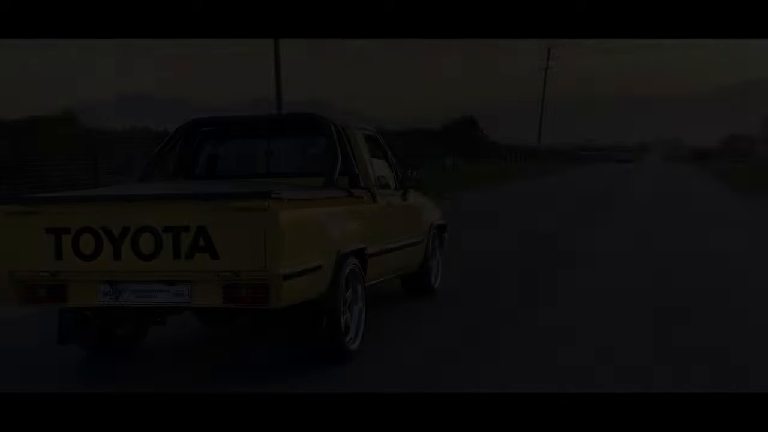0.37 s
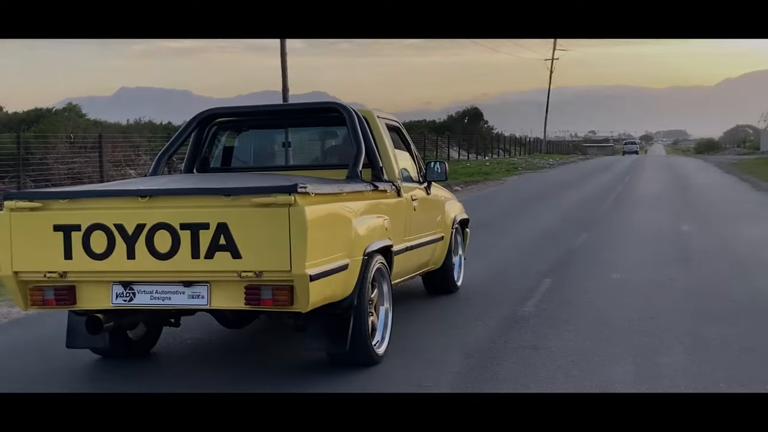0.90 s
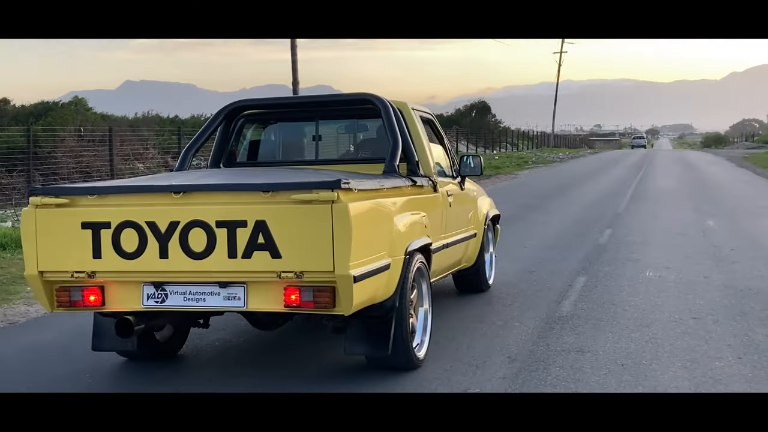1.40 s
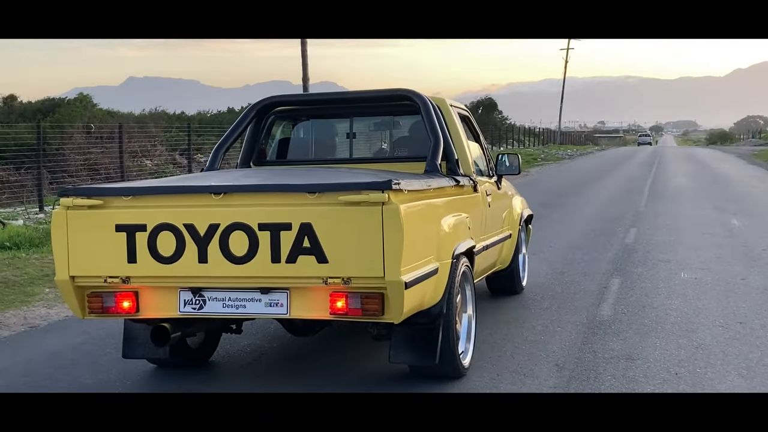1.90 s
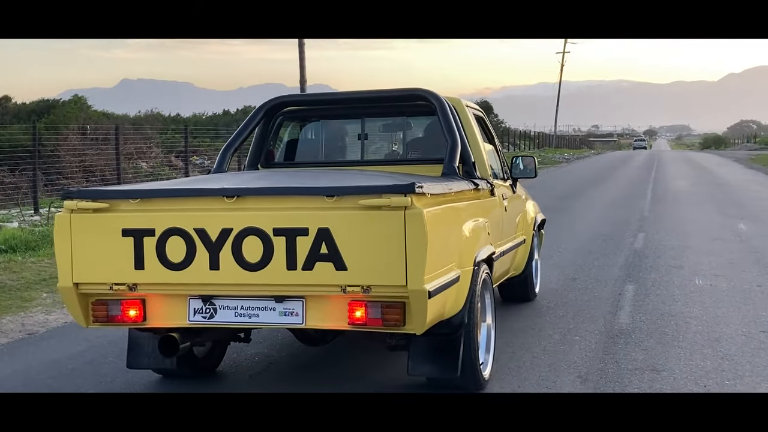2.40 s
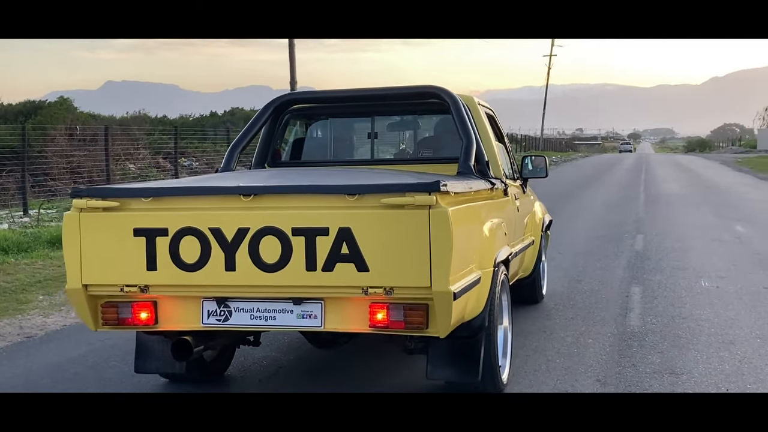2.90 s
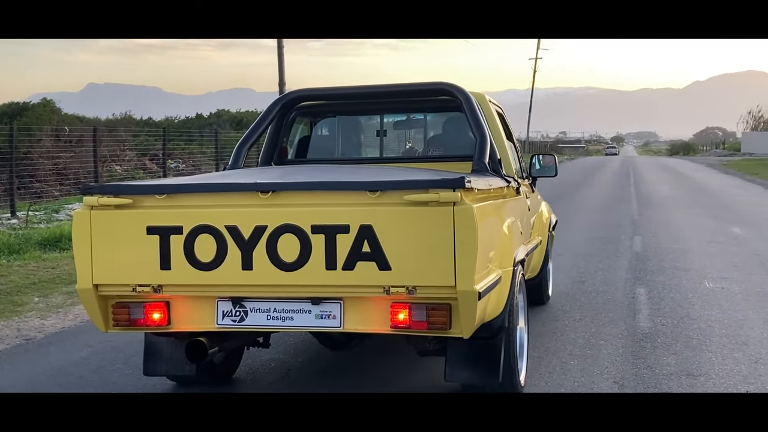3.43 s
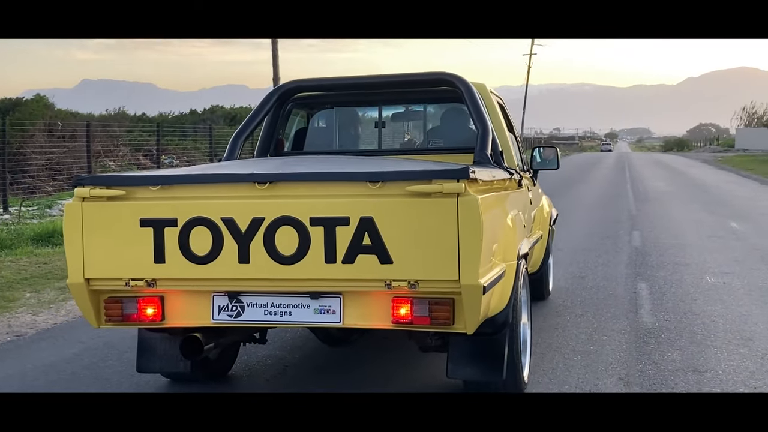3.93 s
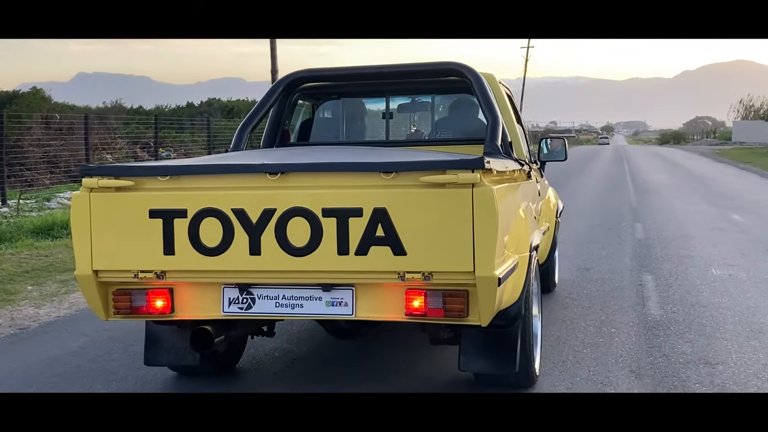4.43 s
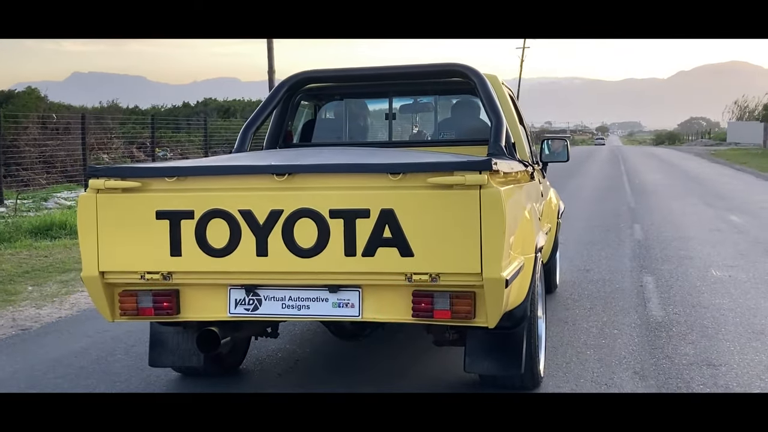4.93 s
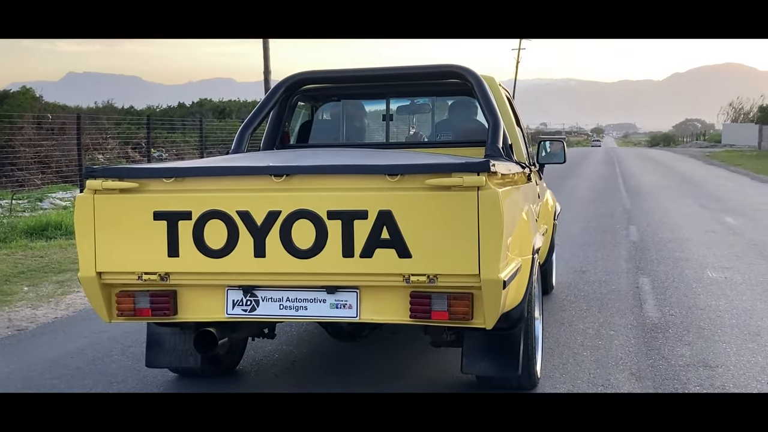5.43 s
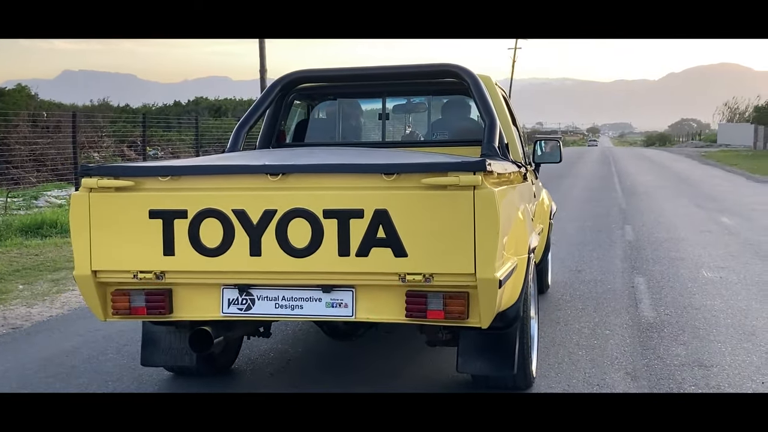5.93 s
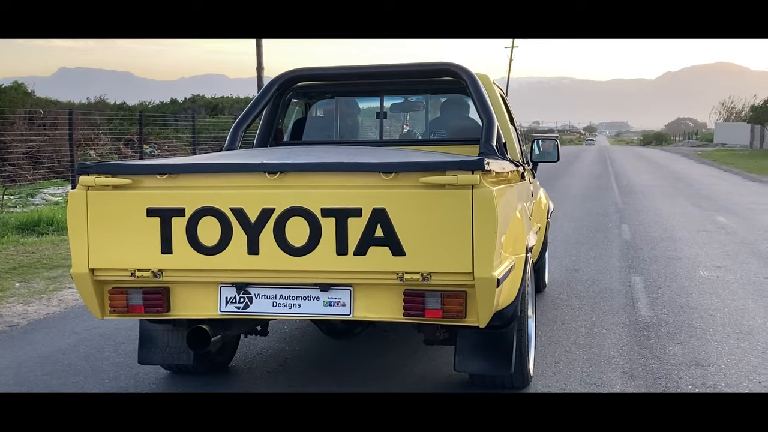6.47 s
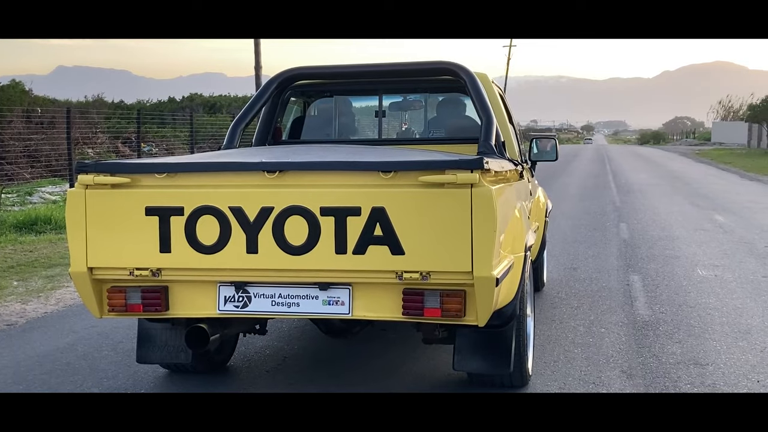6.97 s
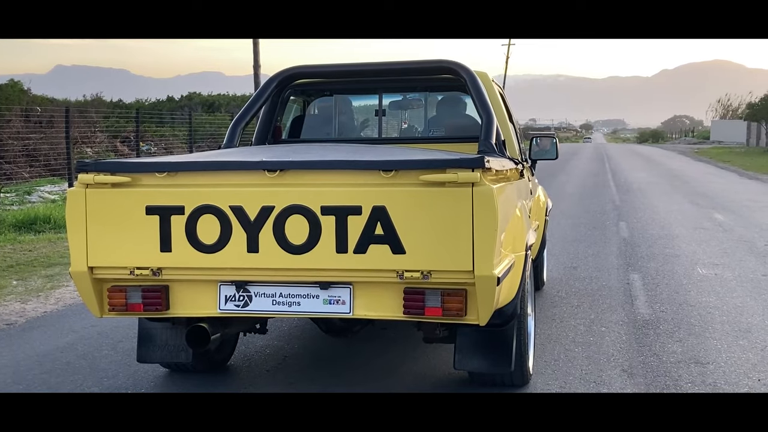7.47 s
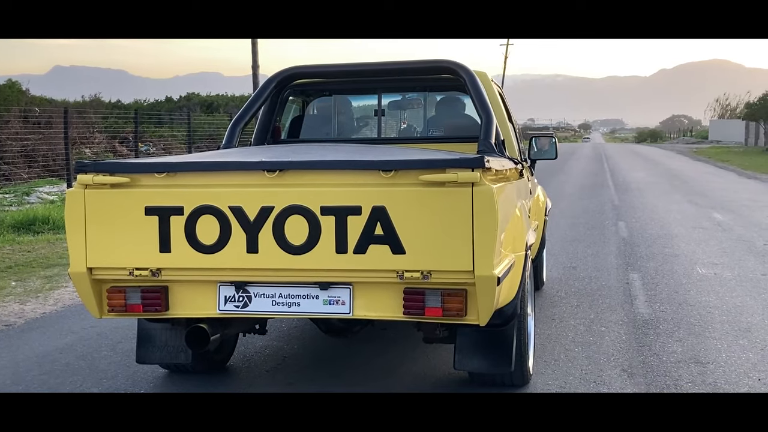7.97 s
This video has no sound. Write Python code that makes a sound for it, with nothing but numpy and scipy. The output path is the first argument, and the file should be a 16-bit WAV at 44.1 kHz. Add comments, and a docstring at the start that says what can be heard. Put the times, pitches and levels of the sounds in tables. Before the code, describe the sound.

A six-cylinder pickup holds a rough, throaty fast idle, its deep exhaust drone stumbling with misfires, soft pops and low thuds outdoors.

```python
"""Pickup at fast idle

A six-cylinder pickup on an open road, heard from a phone carried from its rear corner to behind the tailpipe.
Uneven firing pulses, some of them misfires, ring the exhaust modes; late burns pop and low thuds sit under them.
Filtered noise makes the gas rush, engine-bay hiss and wind; a pump whines in sines, loose metal buzzes once.
The sound fades in over the first second."""
import sys
import numpy as np
from scipy import signal
from scipy.fft import rfft, irfft
from scipy.io import wavfile
from scipy.ndimage import uniform_filter1d, minimum_filter1d

SR = 44100
rng = np.random.default_rng(int(sys.argv[2]) if len(sys.argv) > 2 else 0)


def volts_from_db(level):
    """Convert decibel levels to linear amplitude ratios."""
    exponent = np.asarray(level, float) / 20
    return 10 ** exponent


def wav_record(signal):
    """Record a signal, one row per channel, as 16-bit PCM in the file named by sys.argv[1]."""
    frames = np.transpose(np.atleast_2d(signal))
    bounded = np.clip(frames, -1, 1)
    # unit amplitude maps onto the largest positive 16-bit level
    quanta = np.round(bounded * 32767).astype(np.int16)
    wavfile.write(sys.argv[1], SR, quanta)


N = 357210
T = np.arange(N) / SR


def level(x, rms_db):
    """Set the rms level."""
    return x * volts_from_db(rms_db) / np.sqrt(np.mean(x ** 2))


def curve(table):
    """Interpolate a (time_s, value) table over the scene."""
    return np.interp(T, *np.transpose(table))


def ring(x, hz, width_hz):
    """Two-pole band-pass, gain 1 at the centre."""
    return signal.lfilter(*signal.iirpeak(hz, hz / width_hz, SR), x)


def cut_top(x, hz):
    """Steep zero-phase low-pass."""
    return signal.sosfiltfilt(signal.butter(4, hz, fs=SR, output="sos"), x)


def walk(rate_hz):
    """Smooth chance with about this many changes a second, spread 1."""
    k = int(SR / rate_hz)
    steps = np.repeat(rng.standard_normal(N // k + 1), k)
    slow = uniform_filter1d(uniform_filter1d(steps, k), k)[:N]
    return slow / slow.std()


def swell_and_die(age_s, peak_s):
    """Envelope that rises to 1 at peak_s, then dies away."""
    age = age_s / peak_s
    return age * np.exp(1 - age)


def clicks(time_s, size):
    """Impulses at these times, each shared between two samples."""
    at = np.clip(time_s * SR, 0, N - 2)
    i = at.astype(int)
    late = at - i
    return np.bincount(i, size * (1 - late), N) + np.bincount(i + 1, size * late, N)


def port_noise(colour, lead_rad, alike):
    """Coloured noise at two ports: a shared part with a phase lead on the left, and unrelated parts."""
    hz = np.fft.rfftfreq(N, 1 / SR) + 1
    point_hz, point_db = np.transpose(colour)
    gain = volts_from_db(np.interp(np.log(hz), np.log(point_hz), point_db, left=-90, right=-90))
    shared, left, right = rfft(rng.standard_normal((3, N)))
    alike = np.clip(alike(hz), 0, 1)
    turn = np.exp(.5j * lead_rad(hz))
    common = np.sqrt(alike) * shared * np.array([turn, 1 / turn])
    separate = np.sqrt(1 - alike) * np.array([left, right])
    return level(irfft(gain * (common + separate), N), 0)


# wind gain: time_s, gain_db
WIND_GAIN = [(0, -23.5), (5, -24.5), (6.3, -34), (8.1, -22)]


def wind():
    """Low buffeting in lumps: narrow low noise, mostly alike at the two ports."""
    noise = rng.standard_normal((2, N))
    for width_hz in (45, 50, 60):
        noise = ring(noise, 58, width_hz)
    mid, side = noise * volts_from_db(4 * walk(8))
    return level(mid + .3 * np.array([side, -side]), 0) * volts_from_db(curve(WIND_GAIN))


# loose-metal buzzes: start_s, envelope_peak_db (before the filters)
BUZZES = [(4.612, -25.5)]


def rattles():
    """A short dull buzz of loose metal: a noise burst through a broad band."""
    envelope = np.zeros(N)
    for start_s, peak_db in BUZZES:
        envelope += volts_from_db(peak_db) * swell_and_die(np.clip(T - start_s, 0, .3), 0.011)
    return cut_top(ring(envelope * rng.standard_normal(N), 1500, 3200), 3900)


# pump tones: mean_pitch_hz, level_db (before swell and wander)
PUMP_TONES = [(3262, -59), (3558, -55.5), (3860, -57.5), (6815, -55), (7101, -69), (8253, -67.5)]
# gain of all pump tones: time_s, gain_db
PUMP_SWELL = [(0, -13), (4, -10), (5.5, -5), (7, -5), (8.1, -9)]


def whine():
    """Thin tones of an electric pump: sines that wander slightly in pitch and level."""
    tones = np.zeros(N)
    for hz, level_db in PUMP_TONES:
        phase = 2 * np.pi * np.cumsum(hz + 5 * walk(5)) / SR
        tones += np.sqrt(2) * volts_from_db(level_db + 2 * walk(6)) * np.sin(phase)
    return tones * volts_from_db(curve(PUMP_SWELL))


# hiss spectrum: freq_hz, relative_density_db
HISS_COLOUR = [(4500, -22), (6200, -15), (7500, -11), (8250, -7), (8800, -6.5), (10200, -7), (12000, -7.5),
               (14000, -12), (16000, -17.5)]
HISS_LAG_MS, HISS_TURN_CYCLES, HISS_ALIKE = 0.2278, 0.43, 0.99  # left port lags, plus a fixed phase turn


def hiss(gust):
    """Fan and intake hiss from one spot ahead; it reaches the right port first."""
    noise = port_noise(HISS_COLOUR, lambda f: -2 * np.pi * (f * HISS_LAG_MS / 1000 + HISS_TURN_CYCLES),
                       lambda f: HISS_ALIKE)
    return noise * volts_from_db(0.16 * gust + 0.6 * walk(35))


# gas spectrum: freq_hz, relative_density_db
GAS_COLOUR = [(230, -24.5), (300, -0.5), (440, 5), (700, -1.5), (1100, -7), (1500, -5.5), (2000, -6),
              (2430, -6.5), (2800, -10.5), (3300, -12.5), (4500, -14), (6000, -14), (7500, -23)]
# gas at the two ports: freq_hz, left_lead_rad, likeness_0_to_1
GAS_AT_PORTS = [(300, .05, .9), (1400, .2, .7), (1900, .6, .1), (2500, 1.1, .5), (3000, 1.1, .25),
                (4000, .5, .6), (4700, 1.6, .4), (5600, 3.1, .75), (7500, 3.1, .5)]
GAS_LEFT_DB = 1.5


def gas(puff, gust):
    """Turbulent exhaust gas: noise partly gated by the puffs, with gusts."""
    hz, lead_rad, alike = np.transpose(GAS_AT_PORTS)
    noise = port_noise(GAS_COLOUR, lambda f: np.interp(f, hz, lead_rad), lambda f: np.interp(f, hz, alike))
    noise = noise * volts_from_db(np.array([[GAS_LEFT_DB], [0]]))
    gate = 1 + 0.084 * (puff - 1)
    return level(noise * gate * volts_from_db(0.9 * gust + 1.17 * walk(9)), 0)


# resonances shaken by the gas: freq_hz, width_hz, relative_db
ROAR_MODES = [(676, 113, 0), (773, 33, -23), (944.5, 43, 0.5), (1046, 24, 2.5), (1160, 120, -6.5)]
# higher resonances: freq_hz, width_hz, relative_db
PANEL_MODES = [(1403, 92, 6), (2523, 50, -5.5)]
# resonances that come up towards the rear: freq_hz, width_hz, relative_db
RASP_MODES = [(649, 25, -9), (787, 20, 0), (1615, 41, -10), (1873, 41, -13)]


def shaken(modes, puff):
    """Gas turbulence, gated by the puffs, in steep resonances; mostly alike at the two ports."""
    mid, side = rng.standard_normal((2, N)) * (1 + .6 * (puff - 1))
    shake = mid + 0.28 * np.array([side, -side])
    return level(sum(volts_from_db(db) * ring(ring(shake, hz, width_hz), hz, 2 * width_hz)
                     for hz, width_hz, db in modes), 0)


# soft low thuds: start_s, envelope_peak_db
LOW_THUDS = [(0.276, -16), (0.479, -25), (0.712, -26), (1.101, -25), (1.746, -19), (2.235, -24),
             (2.588, -15), (2.822, -25), (3.483, -19), (3.9, -18), (4.622, -17), (4.837, -19), (5.325, -17),
             (5.535, -32), (7.023, -15), (7.682, -18)]
THUD_MEAN_HZ, THUD_RISE_S = 54, .032


def thuds():
    """Each thud is a few soft low cycles, with its own pitch and phase."""
    out = np.zeros(N)
    for start_s, peak_db in LOW_THUDS:
        detune, turn = rng.standard_normal(2)
        age_s = np.clip(T - start_s, 0, .3)
        tone = np.sin(2 * np.pi * THUD_MEAN_HZ * (1 + .08 * detune) * age_s + 2 * turn)
        out += volts_from_db(peak_db) * swell_and_die(age_s, THUD_RISE_S) * tone
    return out


# late burns in the pipe: start_s, envelope_peak_db (before roughening)
LATE_BURNS = [(.76, -31), (1.135, -20.5), (1.365, -26), (2.505, -23), (3.125, -20.5), (4.12, -25),
              (5.071, -25), (5.115, -24)]
POP_START_HZ, POP_GLIDE_HZ_PER_S, POP_RISE_S, POP_ROUGH = 300, 5000, .013, 1.1


def pops():
    """Each late burn is a short throaty burble that glides up, roughened by the flame."""
    out = np.zeros(N)
    for start_s, peak_db in LATE_BURNS:
        age_s = np.clip(T - start_s, 0, .15)
        cycles = (POP_START_HZ + POP_GLIDE_HZ_PER_S * age_s / 2) * age_s
        out += volts_from_db(peak_db) * swell_and_die(age_s, POP_RISE_S) * np.sin(2 * np.pi * cycles)
    return out * (1 + POP_ROUGH * walk(260))


def pipe(pulses, modes, band):
    """Pulses ring the modes, neighbours in opposite sign, then pass the outlet band."""
    out = np.zeros(N)
    for k, (hz, width_hz, db) in enumerate(modes):
        out += (-1) ** k * volts_from_db(db) * ring(pulses, hz, width_hz)
    return level(ring(out, *band), 0)


# engine speed: time_s, firings_per_s
FIRING_RATE = [(0, 103.48), (0.5, 102.55), (1, 101.85), (1.5, 102.61), (2, 102.75), (2.4, 102.38),
               (2.8, 100.52), (3.3, 99.69), (3.7, 100.97), (4.3, 97.51), (4.8, 97.34), (5.3, 96.8),
               (5.8, 97.75), (6.2, 98.21), (6.6, 99.61), (7.05, 100.07), (7.5, 98.27), (8.1, 98.09)]
# unequal manifold runners, a row per cylinder: thump_db, thump_lag_ms, bark_db, bark_lag_ms
RUNNERS = [(-0.35, -6.07, -0.1, -7.16), (1.3, -5.27, 5.4, -8.64), (-2.82, -6.44, -1.6, -8.9),
           (1.76, -5.29, 1.0, -8.66), (-0.5, -5.86, -1.8, -9.03), (0.61, -5.92, -2.9, -7.14)]
# misfires: time_s, push (1 normal, under 0 the cylinder sucks back)
WEAK_FIRINGS = [(.544, -1.2), (.934, 0.67), (1.111, -0.87), (1.131, -.51), (1.376, 0.72), (1.727, -0.66),
                (2.185, -.85), (2.517, -.2), (3.053, -0.44), (3.152, -0.15), (3.253, 0.096), (3.721, -0.51),
                (4.133, 0.32), (4.153, -0.76), (4.84, -0.63), (5.221, -0.12), (5.386, 0.19), (6.67, 0.2),
                (7.251, 0.0086), (7.687, -0.36), (7.881, -0.56)]
# silencer modes: freq_hz, width_hz, relative_db
SILENCER_MODES = [(62, 188, -17.8), (88, 58, -8.3), (178, 14, -6), (225, 14, -16.5), (262, 16, -17),
                  (275, 42, -18.5)]
# tailpipe modes: freq_hz, width_hz, relative_db
TAILPIPE_MODES = [(378.3, 17.6, -16.5), (471, 82, -22), (538.1, 41.7, -9), (567.4, 24.5, -13.5)]
SILENCER_BAND_HZ, TAILPIPE_BAND_HZ = (206, 160), (350, 800)  # outlet centre, width
SILENCER_TOP_HZ, TAILPIPE_TOP_HZ = 324, 600
WEAK_SHARE, WEAK_PUSH = .05, .45  # share of firings that burn only partly; factor on their push
# after a misfire the next firings come early
LURCH_MS_PER_LOST_PUSH, LURCH_AFTER_S, LURCH_WIDTH_S = 0.55, 0.03, 0.038


def exhaust():
    """Firings drive the silencer (thump), the tailpipe (bark) and the puffing of the gas."""
    firing_count = np.cumsum(curve(FIRING_RATE)) / SR
    n = np.arange(1, int(firing_count[-1]) + 1)
    fire_s = np.interp(n, firing_count, T)
    thump_db, thump_ms, bark_db, bark_ms = np.array(RUNNERS)[n % len(RUNNERS)].T
    push_chance, thump_jitter, bark_chance, bark_jitter, mix_chance, weak_chance = rng.standard_normal((6, len(n)))
    # each cylinder stays richer or leaner for a few of its own cycles
    mixture = signal.lfilter([1], np.r_[1, np.zeros(len(RUNNERS) - 1), -.7], mix_chance)
    push = 1 + .2 * push_chance + .09 * mixture
    push[weak_chance < np.quantile(weak_chance, WEAK_SHARE)] *= WEAK_PUSH
    early = np.zeros(len(n))
    for when_s, weak in WEAK_FIRINGS:
        push[np.argmin(abs(fire_s - when_s))] = weak
        early += (1 - weak) * np.exp(-((fire_s - when_s - LURCH_AFTER_S) / LURCH_WIDTH_S) ** 2)
    fire_s = fire_s - LURCH_MS_PER_LOST_PUSH * early / 1000

    thump_s = fire_s + (thump_ms + 0.2 * thump_jitter) / 1000
    thump = pipe(clicks(thump_s, push * volts_from_db(thump_db)), SILENCER_MODES, SILENCER_BAND_HZ)
    thump = cut_top(thump, SILENCER_TOP_HZ)

    bark_size = (push + 0.12 * bark_chance) * volts_from_db(bark_db)
    bark_s = fire_s + (bark_ms + .08 * bark_jitter + .05 * mixture) / 1000
    bark = pipe(clicks(bark_s, bark_size), TAILPIPE_MODES, TAILPIPE_BAND_HZ)
    bark = cut_top(bark, TAILPIPE_TOP_HZ)

    # each firing lets out a puff that dies in some milliseconds
    puff_clicks = clicks(fire_s + bark_ms / 1000, abs(bark_size))
    puff = signal.lfilter([1], [1, -np.exp(-1 / (0.013 * SR))], puff_clicks)
    return thump, bark, uniform_filter1d(puff, size=90) / puff.mean()


def side_echo(note):
    """A faint, wavering delayed copy of the note, opposite in sign at the ports."""
    delay_s = .015 + .002 * walk(4)
    echo = volts_from_db(-13) * ring(np.interp(T - delay_s, T, note), 400, 330)
    return np.array([echo, -echo])


# phone carried round the tail: time_s, behind (0 beside the rear corner, 1 straight behind)
PHONE_PATH = [(0, 0), (1.5, 0), (3, 0.45), (4.8, 0.75), (8.1, 0.78)]
# gain of the gas rush below the split: time_s, gain_db
RUSH_GAIN = [(0, -29.5), (.7, -38.5), (1.14, -32), (1.6, -38.5), (1.95, -35), (2.3, -37), (3.3, -36.5),
             (3.7, -41.5), (4, -37.5), (4.5, -37.5), (5.2, -39.5), (6.8, -39.5), (7.3, -39.5), (8.1, -39.5)]
# the ring near 380 Hz swells and sinks: time_s, gain_db
RING_GAIN = [(0, -3), (.9, 2), (1.3, -3), (2, 1), (2.8, -1.5), (3.4, -3.5), (3.9, -0.5), (4.6, 0),
             (5.3, -0.5), (5.8, 2.5), (6.9, 4.5), (7.25, -4), (8.1, 2)]
RING_HZ, RING_WIDTH_HZ = 381, 50
THIRD_HZ, THIRD_WIDTH_HZ = 300, 28  # silencer note that fades towards the rear
GAS_SPLIT_HZ = 3200
HISS_DB_PER_RUSH_DB, RUSH_CALM_DB = 0.13, -39.5  # hiss follows the rush's excess over calm


def scene():
    """All sources as they reach the two ports, with gains that follow the phone's path."""
    behind = curve(PHONE_PATH)

    def on_path(beside_db, behind_db):
        """Gain in dB at the phone's place."""
        return beside_db + (behind_db - beside_db) * behind

    rush_db = curve(RUSH_GAIN)
    hiss_db = on_path(-41.5, -37.5) + HISS_DB_PER_RUSH_DB * (rush_db - RUSH_CALM_DB)
    pan_db = on_path(-1.5, -1.7)  # left minus right

    thump, bark, puff = exhaust()
    bark = bark + (volts_from_db(curve(RING_GAIN)) - 1) * ring(bark, RING_HZ, RING_WIDTH_HZ)
    thump = thump + (volts_from_db(on_path(4.5, -2)) - 1) * ring(thump, THIRD_HZ, THIRD_WIDTH_HZ)
    note = volts_from_db(on_path(-9, -8)) * thump + volts_from_db(on_path(-22, -26)) * bark + pops() + thuds()
    # the right port hears the note two samples later
    near = np.array([note, np.roll(note, shift=2)]) * volts_from_db(np.array([pan_db, -pan_db]) / 2)
    near = near + side_echo(note)

    rings = volts_from_db(on_path(-38, -45)) * shaken(ROAR_MODES, puff)
    rings = rings + volts_from_db(on_path(-48, -42)) * shaken(PANEL_MODES, puff)
    rings = rings + volts_from_db(on_path(-59, -45.5)) * shaken(RASP_MODES, puff)

    gust = walk(4.215)
    rush = gas(puff, gust)
    body = cut_top(rush, GAS_SPLIT_HZ)
    # above the split the rush keeps steadier, so it shares the hiss gain
    rush = volts_from_db(rush_db) * body + volts_from_db(hiss_db + 1.54) * (rush - body)
    return near + rings + rush + volts_from_db(hiss_db) * hiss(gust) + whine() + rattles() + wind()


def top_cut(x):
    """Nothing passes above the cut-off."""
    return signal.sosfilt(signal.butter(12, 17080, fs=SR, output="sos"), x)


def record(dry):
    """A look-ahead limiter holds the peaks; a straight fade opens the sound."""
    room = np.minimum(1, .88 / (abs(dry).max(axis=0) + 1e-9))
    gain = uniform_filter1d(minimum_filter1d(room, size=441), size=441)
    fade = np.interp(T, (0.079, 0.78), (0, 1))  # s
    return top_cut(fade * gain * dry)


dry = scene()
out = record(dry)
wav_record(out)
```